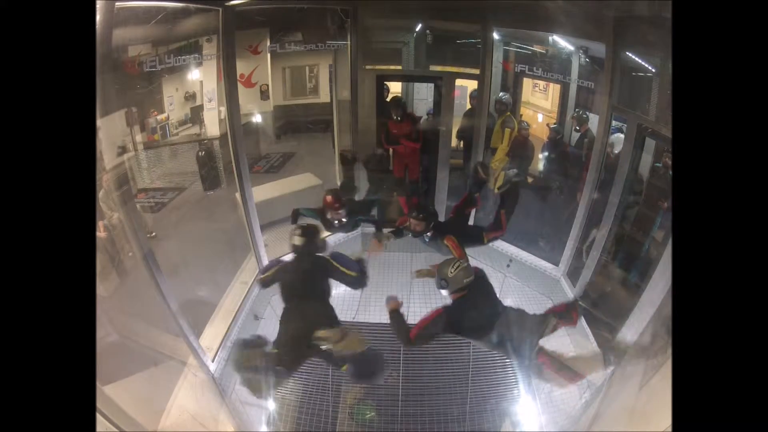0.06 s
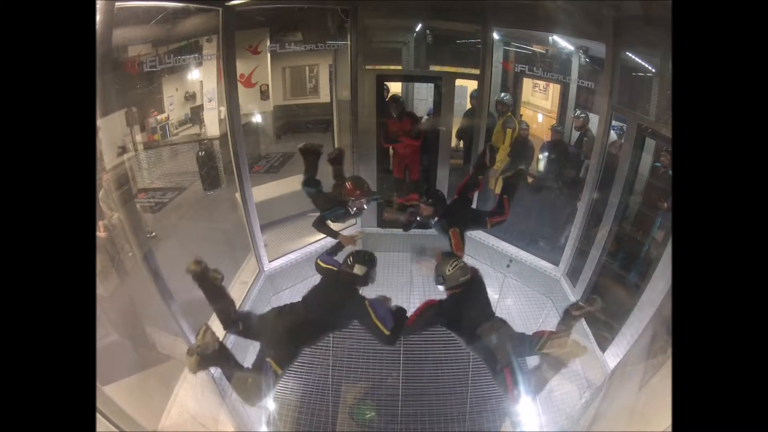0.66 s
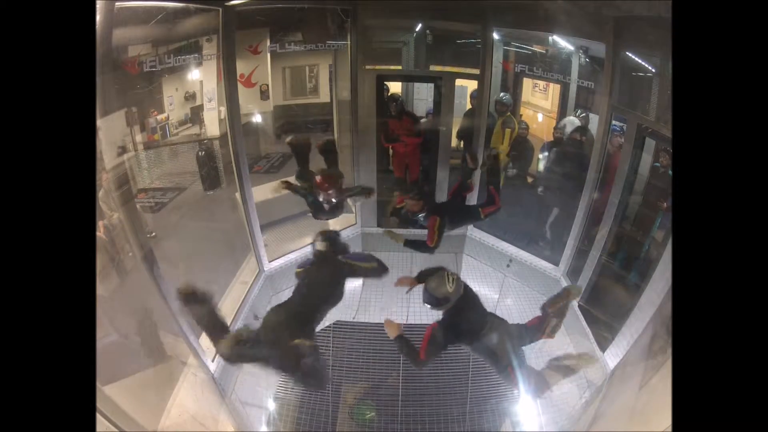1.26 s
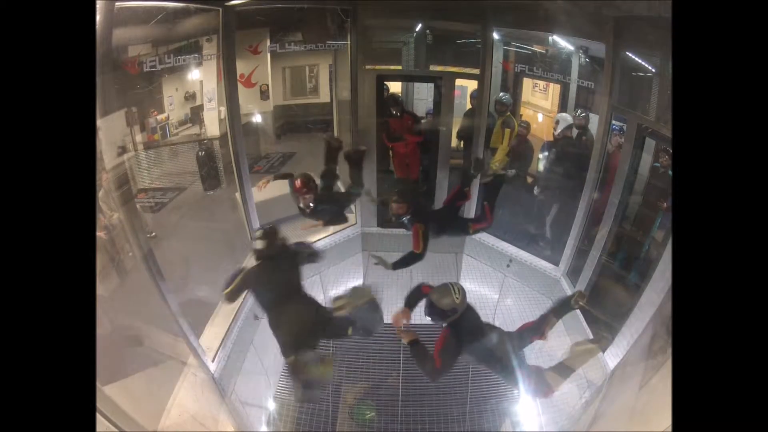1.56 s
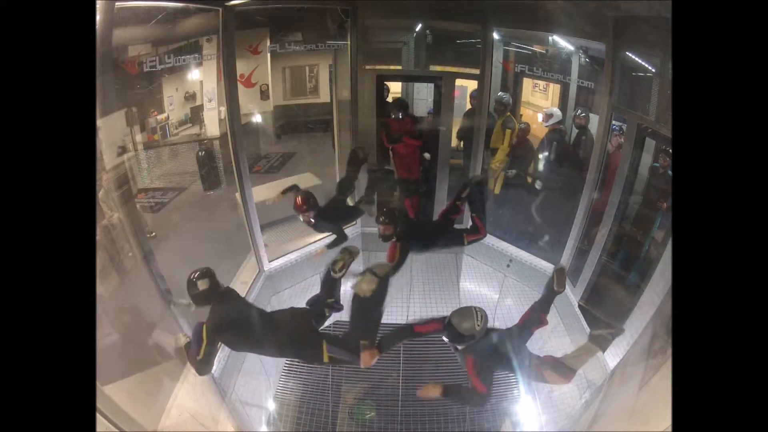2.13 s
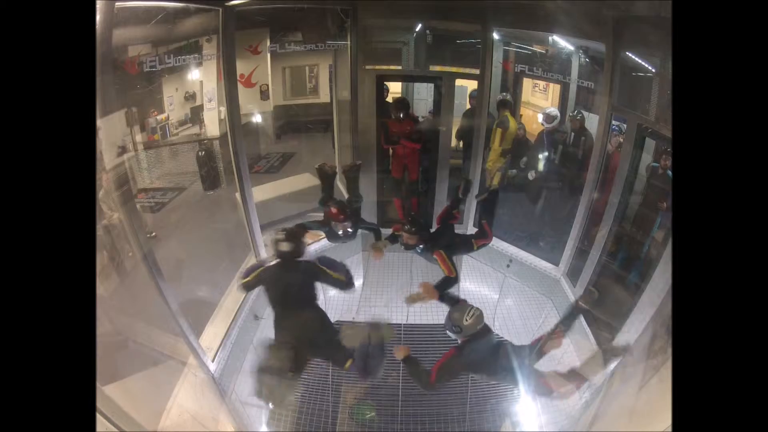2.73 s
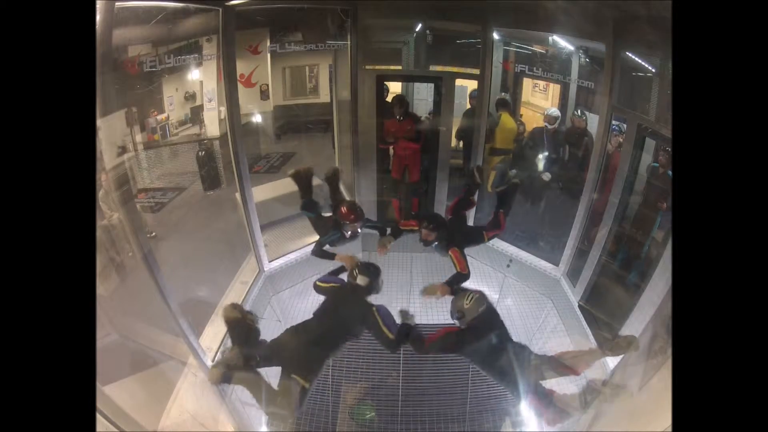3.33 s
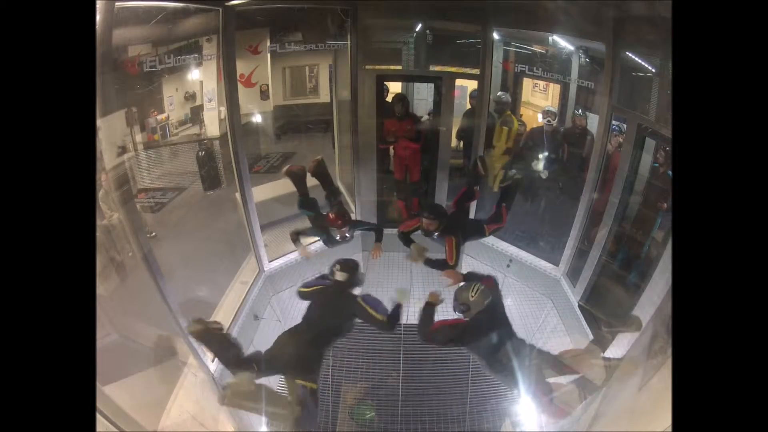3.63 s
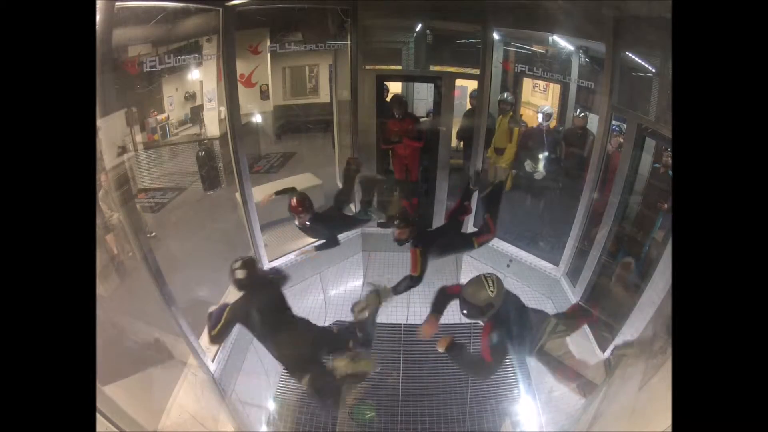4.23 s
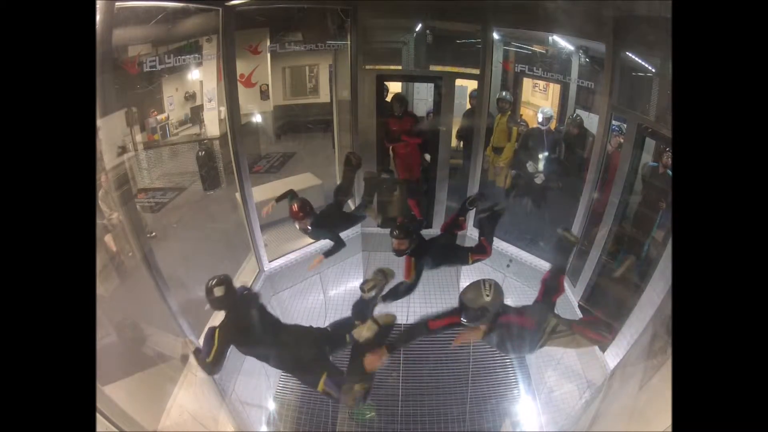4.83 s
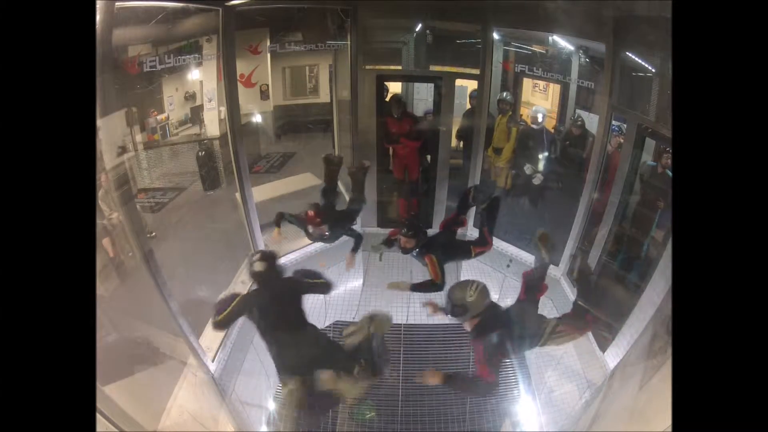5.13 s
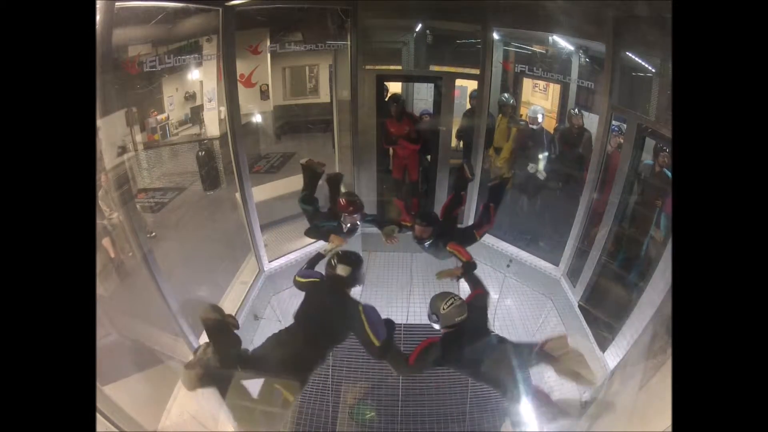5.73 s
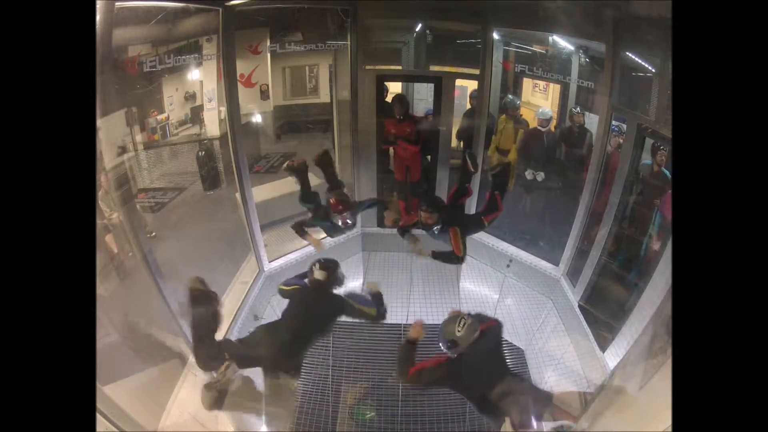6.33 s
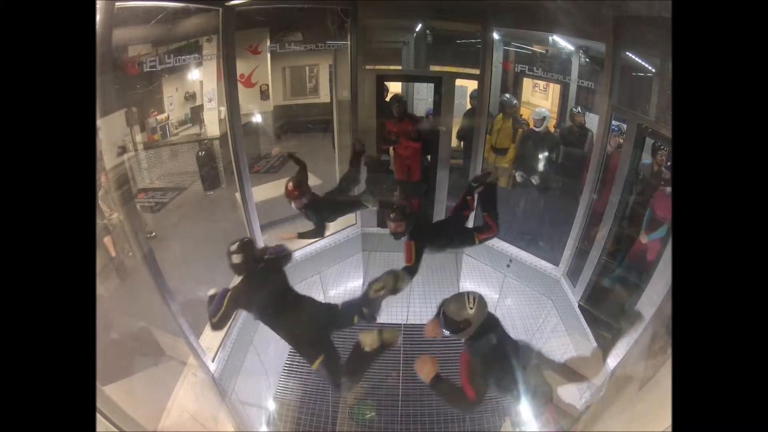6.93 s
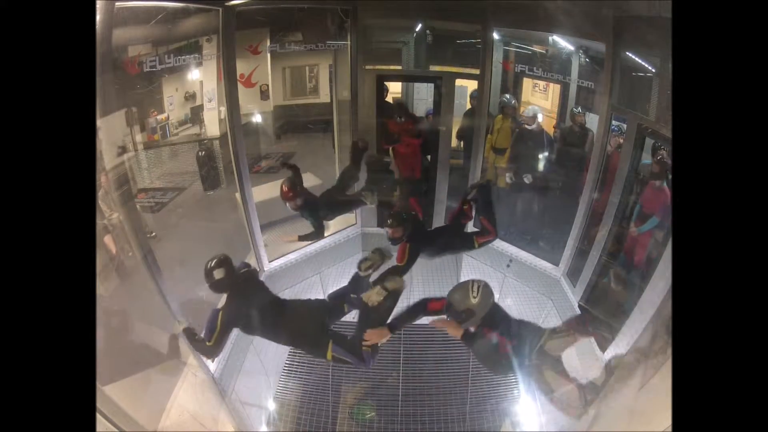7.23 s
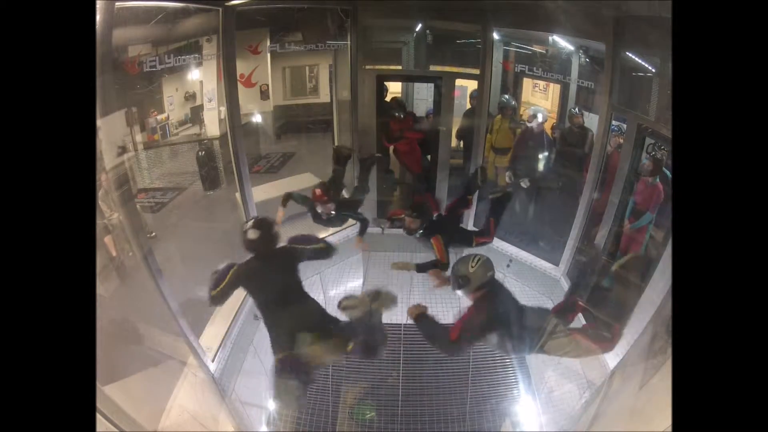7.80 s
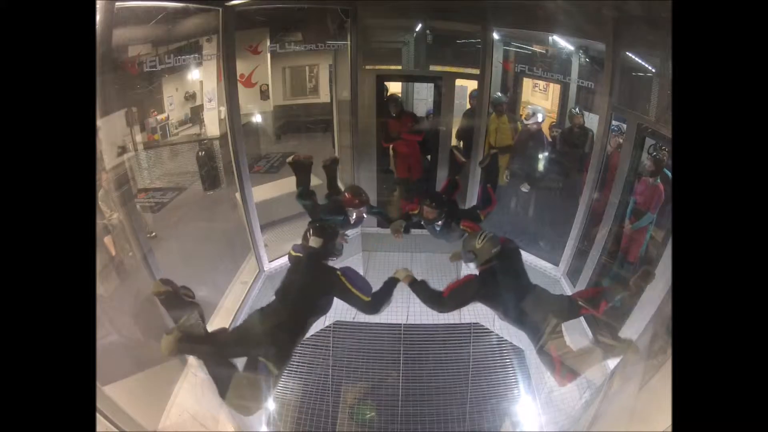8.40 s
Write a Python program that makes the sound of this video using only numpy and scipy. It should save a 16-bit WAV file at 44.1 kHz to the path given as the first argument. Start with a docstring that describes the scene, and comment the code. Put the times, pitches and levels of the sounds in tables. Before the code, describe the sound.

Steady rushing air and low booming buffets fill an indoor wind tunnel, with a faint fan whine and a thin, gritty sizzle.

```python
"""Inside a vertical wind tunnel, heard by a camera fixed to the wall of the flight chamber.
From the start, rushing air rings the camera's housing, turbulence buffets the wall and makes the duct
boom, and the fan drives whine. Gusts and surges come from 0.4 s on; the longest surge is at 6 s,
and the whine swells most at 7 s. Throughout, the camera samples slowly and holds each value,
which mirrors the roar into a thin, gritty sizzle."""
import sys
import numpy as np
from scipy import signal
from scipy.fft import rfft, irfft, next_fast_len
from scipy.io import wavfile
from scipy.ndimage import uniform_filter1d

SR = 44100
rng = np.random.default_rng(int(sys.argv[2]) if len(sys.argv) > 2 else 0)


def inscribe(sig):
    """Save sig as 16-bit PCM at rate SR to the path in sys.argv[1].

    A 1-D sig is mono; a 2-D sig holds one channel per row.
    Samples are clipped to [-1, 1] before scaling.
    """
    pcm = np.round(np.clip(np.atleast_2d(sig).T, -1, 1) * 32767)
    wavfile.write(sys.argv[1], SR, pcm.astype(np.int16))


N = 373086
BOOM_TOP_HZ, BUFFET_TOP_HZ, RUSH_TOP_HZ = 58, 260, 1500
HOLD_HZ = 12000


def walk(rate_hz):
    """Smooth random motion of unit spread."""
    span = int(SR / rate_hz)
    steps = np.repeat(rng.standard_normal(N // span + 2), span)
    smooth = uniform_filter1d(uniform_filter1d(steps, span), span)[:N]
    return smooth / smooth.std()


def swells(table, attack_s=0.04, release_s=0.043):
    """Gain envelope: each swell is full at its start, holds for its length and dies away."""
    t = np.arange(N) / SR
    gain = np.zeros(N)
    for start_s, length_s, db in table:
        rise = np.clip(1 + (t - start_s) / attack_s, 0, 1)
        fall = np.clip(1 - (t - start_s - length_s) / release_s, 0, 1)
        gain = np.maximum(gain, undb(db) * rise * fall)
    return gain


def undb(db):
    """Decibels to gain."""
    return 10 ** (np.asarray(db) / 20)


# Smooth spectrum of turbulent air. Each row: frequency in Hz, relative density in dB.
AIR_SPECTRUM = [(16.0, -37.8), (40.0, -19.5), (65.0, -8.4), (130.0, -18.4), (250.0, -35.7), (500.0, -42.6),
                (850.0, -48.5), (1500.0, -52.8), (2800.0, -59.6), (3400.0, -55.9), (4600.0, -55.1),
                (6000.0, -64.4)]
# Duct and chamber modes. Each row: centre in Hz, width in Hz, relative peak density in dB.
STANDING_WAVES = [(21.0, 4.4, -21.9), (33.6, 3.6, -14.2), (51.3, 6.8, -0.2), (108.0, 13.0, -8.3),
                  (163.0, 28.0, -22.8), (204.0, 16.0, -26.2), (301.0, 89.0, -36.8)]
# Camera housing modes. Each row: centre in Hz, width in Hz, relative peak density in dB.
HOUSING_RINGS = [(659.0, 179.0, -42.1), (1042.0, 149.0, -38.1), (1242.0, 139.0, -46.7),
                 (1862.0, 139.0, -36.7), (2002.0, 299.0, -37.2), (2332.0, 309.0, -40.1),
                 (2632.0, 109.0, -46.4), (3042.0, 289.0, -44.9), (3622.0, 87.0, -44.5),
                 (3762.0, 259.0, -46.4), (4092.0, 309.0, -50.5), (5122.0, 499.0, -51.7)]
def turbulence(low_hz, high_hz, average_s):
    """Eddies of one size range, coloured by duct and housing resonances; unit rms over average_s."""
    size = next_fast_len(N)
    hz = np.maximum(np.arange(size // 2 + 1) * SR / size, 1)
    air_hz, air_db = np.transpose(AIR_SPECTRUM)
    power = undb(np.interp(np.log(hz), np.log(air_hz), air_db)) ** 2
    for centre_hz, width_hz, peak_db in [*STANDING_WAVES, *HOUSING_RINGS]:
        detuning = 2 * (hz - centre_hz) / width_hz
        power += (undb(peak_db) / (1 + detuning ** 2)) ** 2
    band_gain = np.sqrt(power) * (hz >= low_hz) * (hz < high_hz)
    noise = irfft(rfft(rng.standard_normal(size)) * band_gain, size)[:N]
    span = int(SR * average_s)
    local_power = uniform_filter1d(uniform_filter1d(noise ** 2, span), span)
    return noise / np.sqrt(local_power)


# Slow swell of the air over the wall. Each row: time in seconds, level in dB.
RUSH_LEVELS = [(0, -58), (.45, -58), (1.4, -58), (2.9, -58.5), (3.5, -57.5), (4.3, -58.8), (5.4, -58),
               (6.25, -56.6), (7.0, -57.5), (7.5, -57.5), (8.46, -58.5)]
def rushing_air(hiss_db, hiss_follow_ratio, rush_flutter_db, hiss_flutter_db):
    """Fast air rushes over the wall and hisses in the housing; passing eddies shake both a little."""
    times_s, levels_db = np.transpose(RUSH_LEVELS)
    rush_db = np.interp(np.arange(N) / SR, times_s, levels_db)
    hiss_drift_db = hiss_follow_ratio * (rush_db - rush_db.mean())
    eddies = walk(rate_hz=22)
    rush_gain = undb(rush_db + rush_flutter_db * eddies)
    hiss_gain = undb(hiss_db + hiss_drift_db + hiss_flutter_db * eddies)
    rush = turbulence(BUFFET_TOP_HZ, RUSH_TOP_HZ, average_s=0.45)
    hiss = turbulence(RUSH_TOP_HZ, HOLD_HZ / 2, average_s=1.0)
    return rush * rush_gain + hiss * hiss_gain


# Hardest gusts on the wall. Each row: start in seconds, length in seconds, level in dB before trim.
GUSTS = [(.42, 0.15, -40), (.88, 0.078, -38.5), (2.08, 0.075, -41), (2.42, .09, -39.5), (2.72, 0.07, -41.5),
         (3.21, 0.13, -39.5), (3.49, 0.076, -36.5), (4.45, 0.091, -39.5), (4.64, 0.15, -41),
         (5.72, 0.234, -38.5), (6.07, 0.092, -37), (6.82, 0.1, -39.5), (7.04, 0.06, -36.5),
         (8.36, 0.074, -40)]
def wall_buffet(base_db, throb_db, gust_trim_db):
    """Mid-sized eddies thump on the wall: a random throb with gusts on top."""
    base_gain = undb(base_db + throb_db * walk(rate_hz=10))
    gust_gain = undb(gust_trim_db) * swells(GUSTS)
    return turbulence(BOOM_TOP_HZ, BUFFET_TOP_HZ, average_s=0.17) * np.hypot(base_gain, gust_gain)


# Strongest duct surges. Each row: start in seconds, length in seconds, level in dB before trim.
SURGES = [(0.548, 0.056, -30.5), (1.516, 0.048, -34), (1.803, 0.042, -33.5), (3.195, 0.079, -33),
          (3.417, 0.122, -35), (4.186, 0.036, -33.5), (4.401, 0.156, -31), (4.76, 0.073, -33),
          (5.038, 0.03, -37), (5.151, 0.126, -32.5), (5.374, 0.046, -35), (5.997, 0.38, -31),
          (6.457, 0.052, -33.5), (7.434, 0.044, -36), (7.949, 0.154, -33.5), (8.196, 0.04, -33)]
def duct_boom(base_db, throb_db, surge_trim_db):
    """The biggest eddies pump the duct's lowest standing waves: a random throb with surges on top."""
    base_gain = undb(base_db + throb_db * walk(rate_hz=12))
    surge_gain = undb(surge_trim_db) * swells(SURGES)
    return turbulence(0, BOOM_TOP_HZ, average_s=0.17) * np.hypot(base_gain, surge_gain)


# Fan drive tones. Each row: pitch in Hz, rms level in dB before trim, wander in Hz, flutter in dB.
DRIVE_TONES = [(1282.4, -73.0, 1.0, 1.6), (1875.3, -61.5, .8, 1.4), (2105.6, -68.3, 2.0, 1.8)]
# Swells of the whine. Each row: start in seconds, length in seconds, rise in dB.
WHINE_SWELLS = [(.9, 0.26, 1), (3.87, .1, 3), (7.03, .16, 4.5)]
def fan_whine(trim_db):
    """Steady drive tones, made to waver and swell by the moving air they cross."""
    whine = np.zeros(N)
    for hz, db, wander_hz, flutter_db in DRIVE_TONES:
        pitch_hz = hz + wander_hz * walk(rate_hz=9)
        phase = 2 * np.pi * np.cumsum(pitch_hz) / SR
        rms = undb(db + trim_db + flutter_db * walk(rate_hz=12))
        whine += np.sqrt(2) * rms * np.sin(phase)
    return whine * np.maximum(1, swells(WHINE_SWELLS))


def scene():
    """Air, buffet, boom and whine at the wall, in mono."""
    air = rushing_air(hiss_db=-56.5, hiss_follow_ratio=0.26, rush_flutter_db=0.58, hiss_flutter_db=0.34)
    buffet = wall_buffet(base_db=-40, throb_db=0.83, gust_trim_db=-1.2)
    boom = duct_boom(base_db=-42, throb_db=2.5, surge_trim_db=-2.0)
    whine = fan_whine(trim_db=-0.3)
    return (air + buffet + boom + whine)[None]


def record(dry):
    """The camera's sample-and-hold mirrors the sound around HOLD_HZ; a steep low-pass cuts the top."""
    slow = signal.resample(dry, round(N * HOLD_HZ / SR), axis=-1)
    held = np.repeat(slow, 4, axis=-1)
    mirrored = signal.resample(held, N, axis=-1)
    lowpass = signal.ellip(10, 0.1, 80, 15180, fs=SR, output="sos")
    return signal.sosfilt(lowpass, mirrored)


dry = scene()
out = record(dry)
inscribe(out)
```